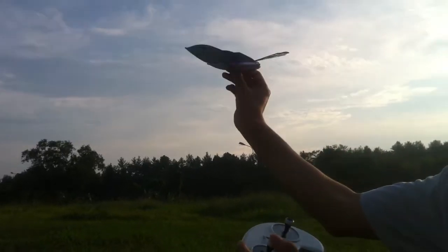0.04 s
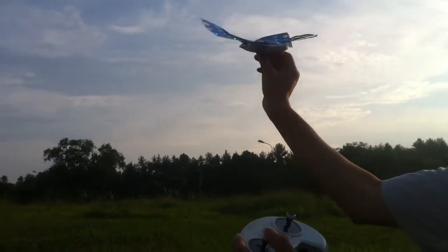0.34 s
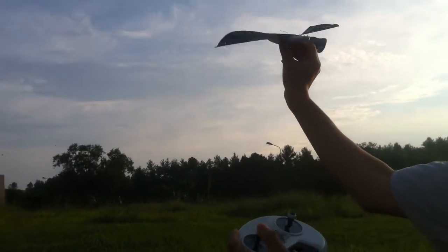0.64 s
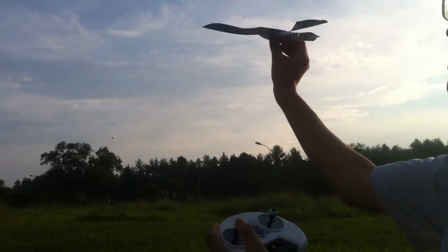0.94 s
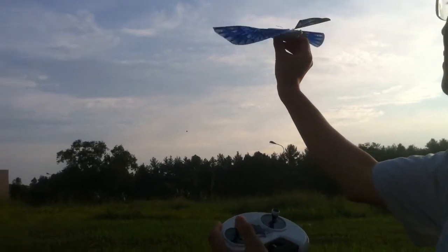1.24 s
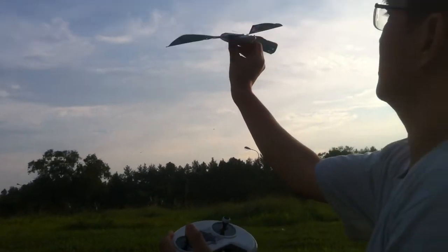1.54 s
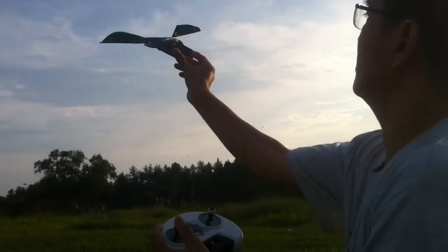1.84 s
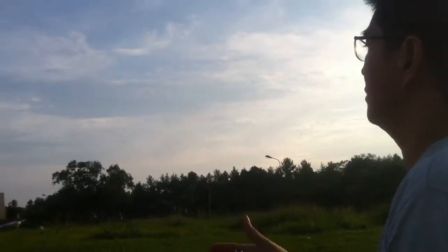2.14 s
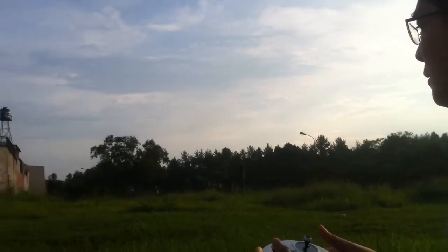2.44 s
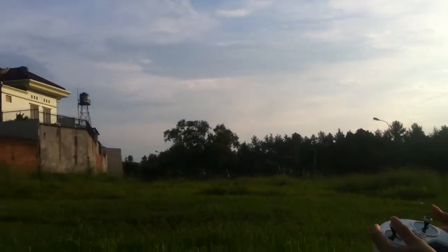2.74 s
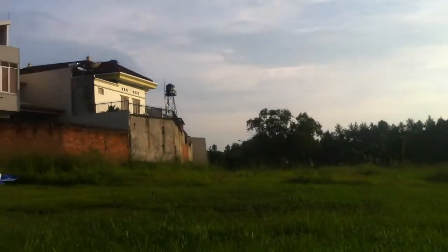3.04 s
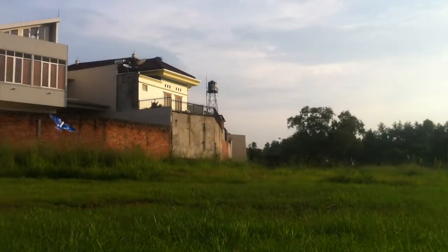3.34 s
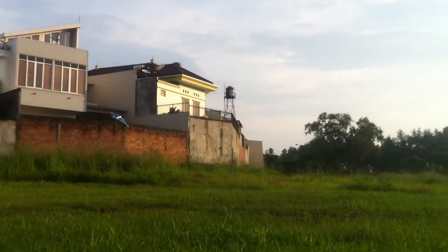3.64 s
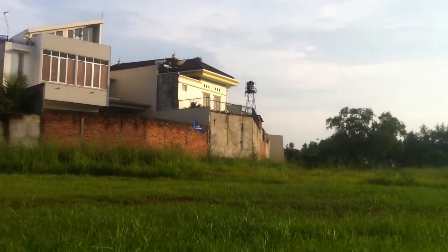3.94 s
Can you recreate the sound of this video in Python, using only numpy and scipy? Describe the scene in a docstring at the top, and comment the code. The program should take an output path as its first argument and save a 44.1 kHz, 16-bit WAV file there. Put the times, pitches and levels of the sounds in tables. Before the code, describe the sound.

Close to the microphone, a flapping toy bird whirs and crackles, its gears whining faster until it is let go and fades with tiny squeaks. Sharp plastic clicks stay near, while a cicada, a thin far tone and open air sit behind.

```python
"""Wind-up toy bird over a field.

A toy bird with foil wings is revved up in the hand, thrown at about 1.9 s and flies off. Each wingbeat
is a rasp of gears and foil, a whine that sags under load, a ring of the body and a snap of the wings;
in flight the linkage squeaks. Close by: dull knocks of the frame and sharp plastic clicks.
Behind it: a cicada, a thin insect note, a far-off tone, a distant engine and open air."""
import sys
import numpy as np
from scipy import signal
from scipy.fft import rfft, irfft
from scipy.io import wavfile
from scipy.ndimage import uniform_filter1d

SR = 44100
rng = np.random.default_rng(int(sys.argv[2]) if len(sys.argv) > 2 else 0)


def unload_wav(signal):
    """Save mono or channel-first audio to the path in sys.argv[1] as 16-bit WAV at rate SR, clipped to [-1, 1]."""
    wavfile.write(
        sys.argv[1],
        SR,
        np.round(np.clip(np.atleast_2d(signal).T, -1, 1) * 32767).astype(np.int16),
    )


N = 176400
T = np.arange(N) / SR


def amp(db):
    """Decibels to gain."""
    return 10 ** (np.asarray(db) / 20)


def unit(x):
    """Scales to rms 1."""
    return x / np.sqrt(np.mean(x ** 2) + 1e-20)


def curve(rows, column=1):
    """One column of a time table at every sample."""
    rows = np.array(rows)
    return np.interp(T, rows[:, 0], rows[:, column])


def colour(x, spectrum):
    """Filters by rows of frequency in Hz and gain in dB; rms 1."""
    hz, db = np.transpose(spectrum)
    bins_hz = np.fft.rfftfreq(N, 1 / SR)
    gain = amp(np.interp(np.log(bins_hz + 1), np.log(hz), db))
    return unit(irfft(rfft(x) * gain, N))


def drift(hz):
    """Smooth random motion up to about hz; rms 1."""
    lowpass = np.exp(-.5 * (np.fft.rfftfreq(N, 1 / SR) / hz) ** 2)
    return unit(irfft(rfft(rng.standard_normal(N)) * lowpass, N))


def resonance(hz, width_hz):
    """Narrow noise band at hz; rms 1."""
    carrier = np.exp(2j * np.pi * np.cumsum(np.full(N, hz)) / SR)
    envelope = drift(width_hz / 2) + 1j * drift(width_hz / 2)
    return unit((envelope * carrier).real)


def burst(phase, at, span):
    """One bell-shaped swell per cycle; at and span in cycles."""
    offset = (phase - at + .5) % 1 - .5
    return np.exp(-.5 * (offset / span) ** 2)


def crackle(grains_per_s=3000, spread_db=3.5, grain_share=.52):
    """Dense tiny impacts of uneven size over a smooth hiss."""
    size = amp(spread_db * np.minimum(rng.exponential(1, N), 4))
    grains = size * rng.choice([-1, 1], N) * (rng.random(N) < grains_per_s / SR)
    return np.sqrt(grain_share) * unit(grains) + np.sqrt(1 - grain_share) * rng.standard_normal(N)


def rough_tone(hz, jitter_hz, flutter_hz=453, flutter_db=3.5):
    """Tone with fast flutter in pitch and level; rms 1."""
    turns = np.cumsum(hz + jitter_hz * drift(flutter_hz)) / SR
    return unit(amp(flutter_db * drift(flutter_hz)) * np.sin(2 * np.pi * turns))


def rasp(beat, turn_start_s=2.05, turn_s=.35, spread_db=.57):
    """Gears and foil crackle with each stroke; the colour changes as the toy turns its tail."""
    # Gear rasp and foil rustle. Each row: time in seconds, level in dB before stroke shaping.
    gear_level = [(0, -44.5), (.55, -45), (1.1, -45), (1.35, -44), (1.85, -43), (2.1, -42.5), (2.33, -40),
                  (2.45, -45.5), (2.58, -47), (2.95, -48.5), (3.25, -53.5), (3.5, -59), (4, -62.5)]
    foil_level = [(0, -45), (.55, -46), (1.1, -45.5), (1.35, -44), (1.8, -44), (2.1, -39.5), (2.33, -39),
                  (2.47, -39.5), (2.58, -40.5), (2.8, -41), (3.05, -46), (3.35, -52), (3.6, -55),
                  (4, -51.5)]
    # Their spectra in the hand and in flight. Each row: frequency in Hz, relative level in dB.
    gear_held = [(200, -19), (900, -14.5), (1500, 0), (2000, -1.5), (2450, 2), (3000, 3.5), (3400, -4),
                 (4200, 1), (5000, -1), (6500, -2), (9000, -8), (16000, -14)]
    gear_flying = [(200, -7), (900, -10), (1500, -3), (2250, -4), (2620, 7.5), (3250, -1), (3800, 8),
                   (4450, -2.5), (4950, 1), (5700, -20), (9000, -7), (16000, -15)]
    foil_held = [(3000, -14), (6000, -21), (7300, 0), (8800, 3), (9800, -1.5), (11300, -1), (12500, -7),
                 (14000, -11), (16000, -11.5)]
    foil_flying = [(3000, -25.5), (6600, -13), (7250, -4), (7900, -0.5), (9500, -3), (10800, -7.5),
                   (12000, -15.5), (13700, -26), (16000, -24)]
    # Stroke shape. Each row: phase in beats, held and flying gain in dB before depth scaling.
    stroke_shape = [(0, -10.5, -9), (.1, -5, -8), (.2, -3.5, -2.5), (.35, -4, -2.5), (.5, -4.5, -1),
                    (.62, -2, -3), (.76, -4, -2), (.83, -4.5, -6), (.91, -6.5, -7)]
    # Depth of that shape. Each row: time in seconds, factor on its dB.
    stroke_depth = [(0, 1.2), (1.05, 0.83), (1.3, 0.77), (1.8, .5), (2.05, 0.87), (2.4, 1.03), (2.7, 1.43),
                    (3.2, 0.67)]
    # Brief dip as the wings reverse. Each row: time in seconds, gain in dB.
    reversal_dip = [(0, -4), (1, -6), (1.3, -1), (2.1, 0), (2.35, -6), (3.1, -6), (3.4, -2)]
    away = np.clip((T - turn_start_s) / turn_s, 0, 1)
    phase, held_db, flying_db = np.transpose(stroke_shape)
    stroke_db = (1 - away) * np.interp(beat, phase, held_db, period=1)
    stroke_db += away * np.interp(beat, phase, flying_db, period=1)
    dip_db = curve(reversal_dip) * burst(beat, at=.96, span=.034)
    stroke = amp(curve(stroke_depth) * stroke_db + dip_db + spread_db * drift(20))
    sound = np.zeros(N)
    for level, held, flying in (gear_level, gear_held, gear_flying), (foil_level, foil_held, foil_flying):
        grains = crackle()
        coloured = (1 - away) * colour(grains, held) + away * colour(grains, flying)
        sound += amp(curve(level)) * stroke * coloured
    return sound


def body_rings(beat):
    """Two body resonances ring on the return stroke."""
    # Ring strength. Each row: time in seconds, high ring level in dB, low ring level in dB.
    levels = [(0, -40.5, -59), (.26, -44, -53), (.55, -54, -62), (1.3, -61, -65), (1.8, -50, -50.5),
              (2.2, -61, -42.5), (2.5, -68, -57), (3.2, -76, -80)]
    # Resonances. Each row: phase in beats, span in beats, frequency in Hz, width in Hz.
    rings = [(.66, 0.024, 4390, 260), (.74, 0.13, 2450, 560)]
    return sum(amp(curve(levels, column)) * burst(beat, at, span) * resonance(hz, width_hz)
               for column, (at, span, hz, width_hz) in enumerate(rings, start=1))


def gear_whine(beat, at=.35, wander_hz=45, spread_db=1.2):
    """The gear mesh whines once a beat, sagging under load; it steadies once the toy is let go."""
    # Mesh tone. Each row: time in seconds, pitch in Hz, level in dB, sag in Hz per beat (negative rises).
    mesh = [(.1, 2720, -47.5, 2300), (.46, 2680, -48, 2300), (.6, 3080, -46.5, 2300), (.8, 3220, -48, 2500),
            (1.0, 3600, -51.5, 2300), (1.11, 3780, -50.5, 2100), (1.21, 4080, -46.5, 1700),
            (1.4, 4130, -42.5, 1500), (1.68, 4200, -43, 1200), (1.86, 4430, -42.5, 200),
            (2.07, 4500, -46, -300), (2.33, 4520, -49, -500), (2.43, 4450, -59, -500), (3, 4450, -78, -500)]
    # Roughness. Each row: time in seconds, rms pitch jitter in Hz.
    jitter = [(0, 185), (1.1, 210), (1.4, 165), (1.75, 160), (1.9, 100)]
    # Octave. Each row: time in seconds, level in dB relative to the mesh tone.
    octave_level = [(0, -9), (.45, -10), (.65, -14), (1.2, -8), (1.9, -5), (2.3, 1)]
    sag_hz = curve(mesh, column=3) * (beat - at)
    mesh_hz = curve(mesh) - sag_hz + wander_hz * drift(19.9)
    jitter_hz = curve(jitter)
    tone = rough_tone(mesh_hz, jitter_hz)
    tone += amp(curve(octave_level)) * rough_tone(2 * mesh_hz, 2 * jitter_hz)
    level_db = curve(mesh, column=2) + spread_db * drift(8.5)
    return tone * amp(level_db) * burst(beat, at, span=.115)


def wing_snap(beat):
    """The wings snap once a beat: a short broadband crackle."""
    # Snap strength. Each row: time in seconds, level in dB.
    level = [(0, -42.5), (.25, -42), (.55, -46.5), (1.2, -44.5), (2, -46.5), (2.4, -61), (2.8, -50),
             (3.5, -54)]
    # Snap spectrum. Each row: frequency in Hz, relative level in dB.
    spectrum = [(150, -18), (500, -10.5), (1000, -5), (2400, -3), (3500, -9), (6000, -5), (9000, -7),
                (12000, -6), (16000, -17.5)]
    return amp(curve(level)) * burst(beat, at=.766, span=.062) * colour(crackle(), spectrum)


def bird(start_phase=.56):
    """The crank angle drives rasp, rings, whine and snap."""
    # Crank speed. Each row: time in seconds, wingbeats per second.
    flap_rate = [(0, 8.13), (.45, 8.12), (.85, 9.84), (1.1, 9.98), (1.35, 12.07), (1.6, 12.36),
                 (1.8, 13.64), (2.12, 13.44), (2.25, 12.07), (2.5, 12.35), (2.68, 13.54), (3.05, 14.59),
                 (3.4, 13.21)]
    beat = (start_phase + np.cumsum(curve(flap_rate)) / SR) % 1
    return rasp(beat) + body_rings(beat) + gear_whine(beat) + wing_snap(beat)


def cicada(rate_hz=52.97, waver_hz=.06, top_hz=8580, fall_hz=1656):
    """A cicada's fast train of falling chirps."""
    # Song strength. Each row: time in seconds, level in dB.
    level = [(0, -62), (2, -59), (2.7, -57), (3.2, -57), (3.5, -56.5), (4, -56)]
    cycle = np.cumsum(rate_hz + waver_hz * drift(3)) / SR % 1
    tone = rough_tone(top_hz - fall_hz * cycle, jitter_hz=114.2)
    return amp(curve(level)) * unit(burst(cycle, at=.63, span=.21) * tone)


def insect_note(hz=3863, width_hz=85, octave_db=.5, flicker_db=4, flicker_hz=14):
    """Another insect's thin flickering note with its octave."""
    # Note strength. Each row: time in seconds, level in dB.
    level = [(0, -55), (.4, -59), (1.2, -59), (2, -76), (3.3, -83)]
    note = resonance(hz, width_hz) + amp(octave_db) * resonance(2 * hz, 2 * width_hz)
    return amp(curve(level)) * unit(note * amp(flicker_db * drift(flicker_hz)))


def far_tone(hz=1353, waver_hz=4, gain_db=1):
    """A thin far-off tone of near-steady pitch swells and fades."""
    # Swells. Each row: time in seconds, level in dB before gain_db.
    level = [(0.0, -50), (0.2, -67), (0.26, -55), (0.36, -47.5), (0.39, -62), (0.43, -45.5), (0.71, -44.5),
             (0.76, -54), (0.79, -45), (0.9, -48), (0.95, -68), (0.99, -44.5), (1.04, -57), (1.15, -47),
             (1.2, -68), (1.24, -55.5), (1.51, -52.5), (1.6, -59.5), (1.75, -44.5), (1.84, -46),
             (1.87, -58), (1.97, -63), (2.02, -54.5), (2.14, -52.5), (2.18, -66), (2.36, -46.5),
             (2.41, -51.5), (2.45, -44.5), (2.52, -55.5), (2.67, -63.5), (2.72, -54), (2.9, -47),
             (2.95, -58), (3.03, -53), (3.06, -63), (3.19, -47.5), (3.25, -63), (3.29, -52.5),
             (3.42, -61.5), (3.45, -55), (3.82, -62), (3.85, -47.5), (3.98, -70), (4.0, -48)]
    turns = np.cumsum(hz + waver_hz * drift(22)) / SR
    return amp(curve(level) + gain_db) * unit(np.sin(2 * np.pi * turns))


def far_engine(waver_db=2.95, waver_rad=.28):
    """Three wavering low orders of a distant engine."""
    # Engine run. Each row: time in seconds, cycle rate in Hz, gain in dB.
    run = [(0, 34.5, -4), (1, 35.56, -4.5), (2, 35.98, 1.5), (3, 35.99, -2), (4, 37.42, 1)]
    # Orders. Each row: multiple of the cycle rate, level in dB before that gain.
    orders = [(4, -60), (5, -58.5), (6, -61)]
    turns = np.cumsum(curve(run)) / SR
    hum = np.zeros(N)
    for order, db in orders:
        waver = amp(waver_db * drift(4.7))
        hum += amp(db) * unit(waver * np.sin(2 * np.pi * order * turns + waver_rad * drift(2.1)))
    return amp(curve(run, column=2)) * hum


def air(level_db=-50, patch_db=1.5, rumble_below_hz=400):
    """Distant rumble and soft hiss with faint drifting patches."""
    # Open-air spectrum. Each row: frequency in Hz, relative level in dB.
    spectrum = [(20, -36), (55, -24), (80, -14.5), (115, -2.5), (150, 2), (200, -2.5), (260, -7.5),
                (370, -8.5), (520, -16.5), (1000, -17.5), (1700, -13.5), (2100, -14), (2600, -15.5),
                (3300, -21.5), (3800, -25), (4400, -27), (5000, -23.5), (5700, -31), (6500, -31),
                (7500, -16.5), (8400, -44), (9500, -25), (12000, -31), (16000, -30)]
    # Slight swell of the rumble. Each row: time in seconds, gain in dB at the lowest frequencies.
    rumble_swell = [(0, 0), (1.5, 0.5), (2.2, -0.5), (3, 0.5), (4, 0.5)]
    hz, t, bins = signal.stft(rng.standard_normal(N), SR, nperseg=1024, noverlap=768)
    patches = uniform_filter1d(rng.standard_normal(bins.shape), size=12, axis=0)
    patches = unit(uniform_filter1d(patches, size=12, axis=1))
    low_band = np.exp(-(hz / rumble_below_hz) ** 2)
    swell_db = np.outer(low_band, np.interp(t, *np.transpose(rumble_swell)))
    _, noise = signal.istft(bins * amp(patch_db * patches + swell_db), nperseg=1024, noverlap=768)
    return amp(level_db) * colour(noise[:N], spectrum)


def taps(events, modes, rebound_s=.00096, rebound_db=-16):
    """Each tap rings the modes of a plastic part and rebounds once."""
    t = np.arange(2048) / SR
    ring = sum((-1) ** k * amp(db - 60 * t / t60_s) * np.sin(2 * np.pi * hz * t)
               for k, (hz, db, t60_s) in enumerate(modes))
    hits = np.zeros(N)
    for start_s, db in events:
        hits[round(start_s * SR)] += amp(db)
        hits[round((start_s + rebound_s) * SR)] += amp(db + rebound_db)
    return signal.oaconvolve(hits, ring / abs(ring).max())[:N]


def frame_knocks():
    """The frame knocks dully in the hand."""
    # Knocks. Each row: start in seconds, peak in dB.
    events = [(1.1564, -42), (1.6646, -34), (1.7424, -31)]
    # Frame modes. Each row: frequency in Hz, relative level in dB, T60 in seconds.
    modes = [(586, -7, .02), (834, 3, 0.011), (1166, 8, 0.0075), (1780, 6.5, 0.013)]
    return taps(events, modes)


def plastic_clicks():
    """Sharp clicks close by: high, quickly damped modes of plastic."""
    # Clicks. Each row: start in seconds, peak in dB.
    events = [(1.2984, -32), (1.3278, -35), (2.018, -33), (2.390, -34), (3.5384, -27), (3.7545, -40),
              (3.8722, -27.5)]
    # Plastic modes. Each row: frequency in Hz, relative level in dB, T60 in seconds.
    modes = [(1990, 4.5, 0.0059), (2500, 3.5, 0.0051), (3100, -2, 0.0076), (6100, -6, 0.0034),
             (7350, -25, 0.0026)]
    return taps(events, modes)


def linkage_squeaks(hz=8650, fall_hz_per_s=460000, peak_s=.001, width_s=.001, gain_db=-9):
    """The linkage slips in flight: very short, steeply falling squeaks."""
    # Slips. Each row: time in seconds, level in dB before gain_db.
    slips = [(2.0208, -32), (2.0964, -26), (2.1724, -32), (2.249, -23), (2.3301, -22), (2.4126, -22.5),
             (2.4932, -24), (2.6534, -34), (2.7262, -31), (2.9444, -35), (3.0154, -39), (3.0834, -35)]
    times_s, levels_db = np.transpose(slips)
    nearest = abs(T[:, None] - times_s).argmin(axis=1)
    from_peak_s = T - times_s[nearest] - peak_s
    envelope = np.exp(-.5 * (from_peak_s / width_s) ** 2)
    tone = rough_tone(hz - fall_hz_per_s * from_peak_s, jitter_hz=251)
    return amp(levels_db[nearest] + gain_db) * envelope * tone


def scene():
    """The toy in front of the field; mono."""
    near = bird() + frame_knocks() + plastic_clicks() + linkage_squeaks()
    field = cicada() + insect_note() + far_tone() + far_engine() + air()
    return (near + field)[None]


def record(dry):
    """Steep low-pass band limit."""
    edge_hz = 15800
    lowpass = signal.firwin(511, edge_hz, window=("kaiser", 9), fs=SR)
    return signal.oaconvolve(dry, lowpass[None], "same")


dry = scene()
out = record(dry)
unload_wav(out)
```